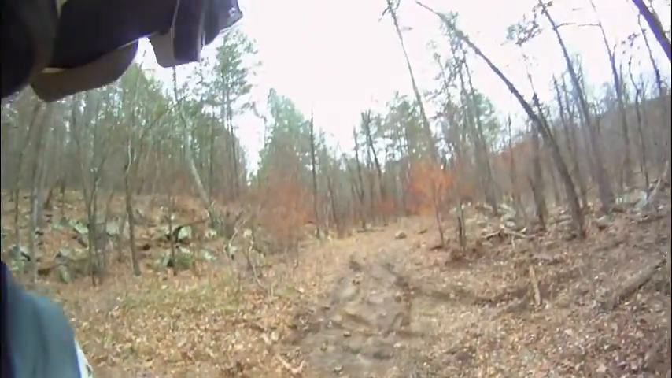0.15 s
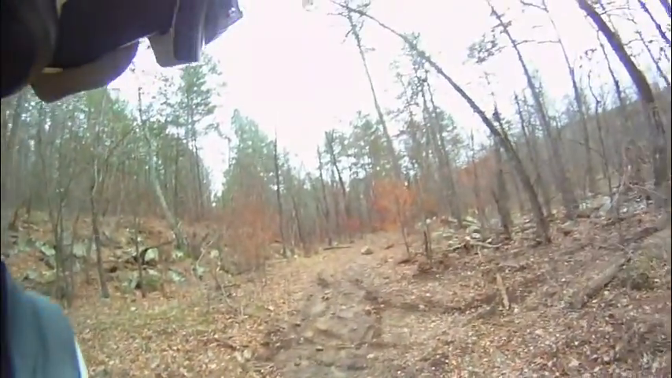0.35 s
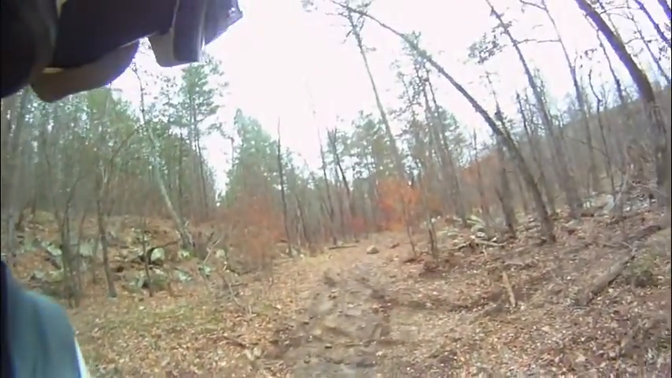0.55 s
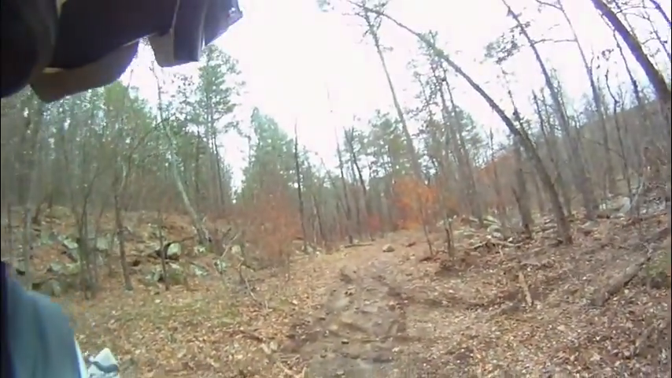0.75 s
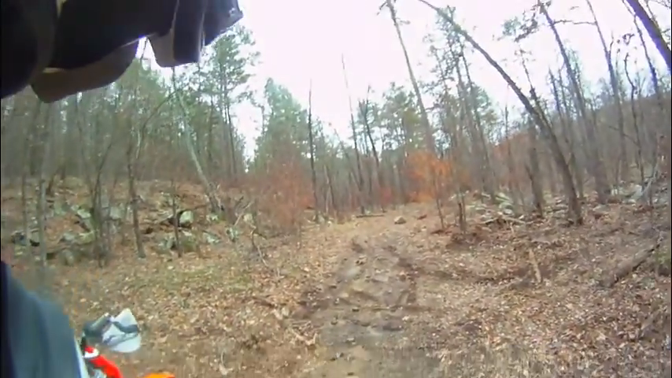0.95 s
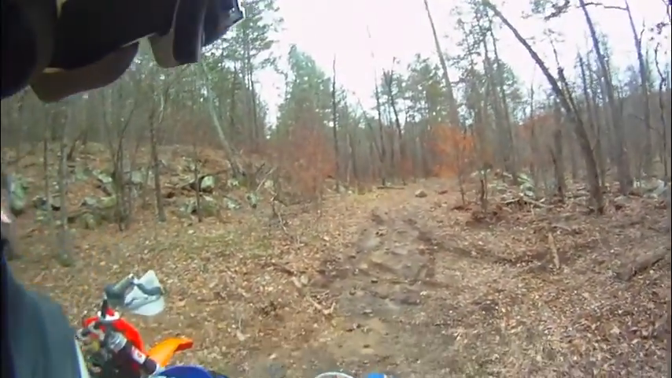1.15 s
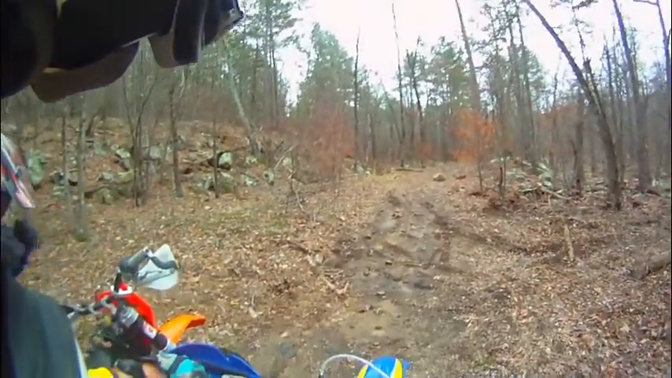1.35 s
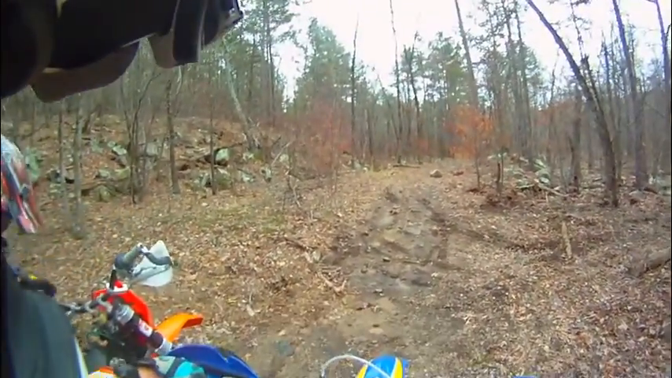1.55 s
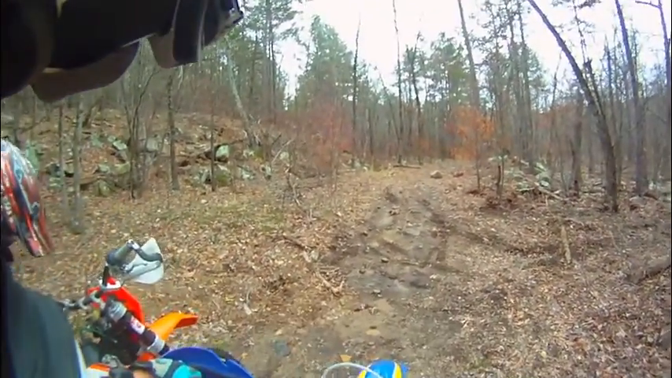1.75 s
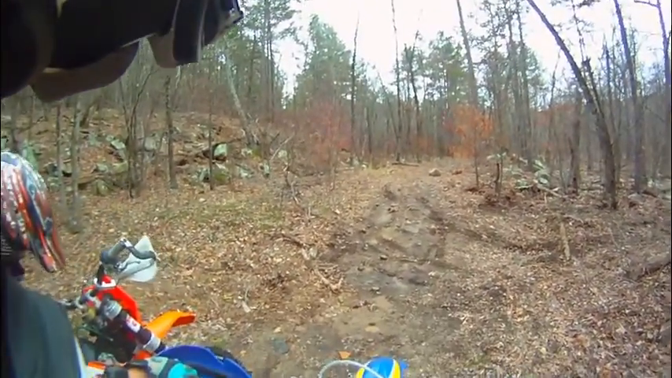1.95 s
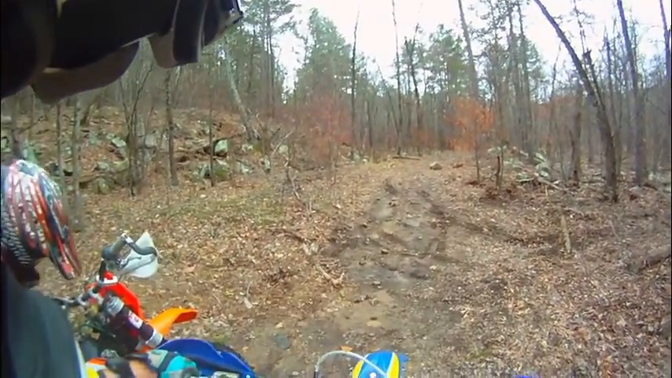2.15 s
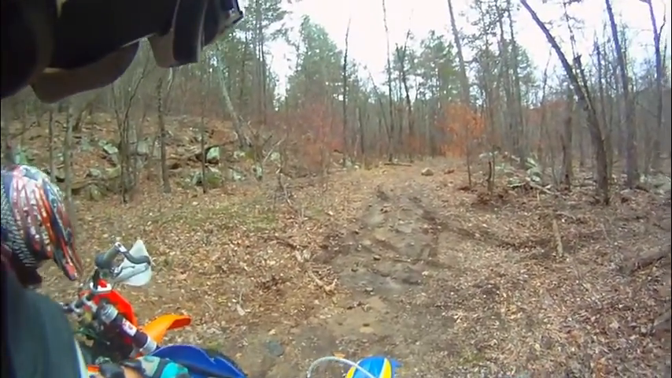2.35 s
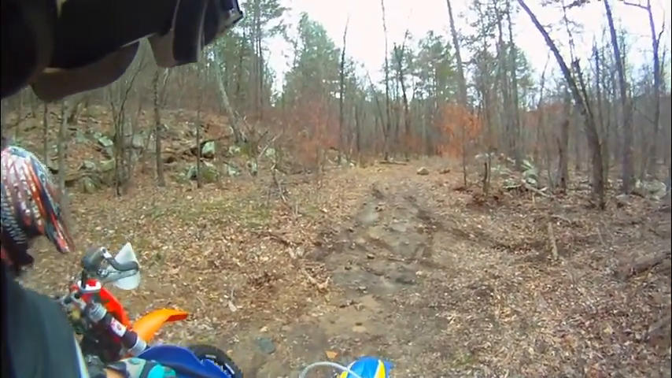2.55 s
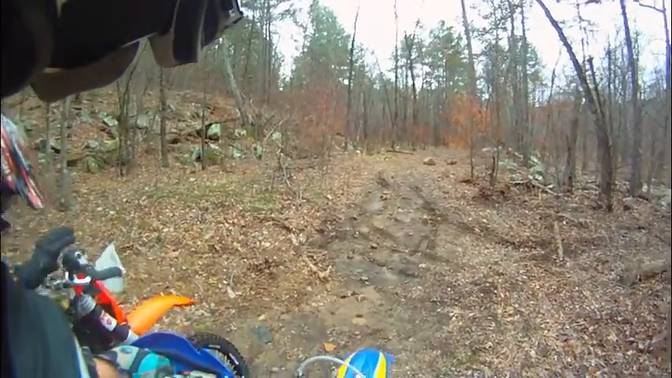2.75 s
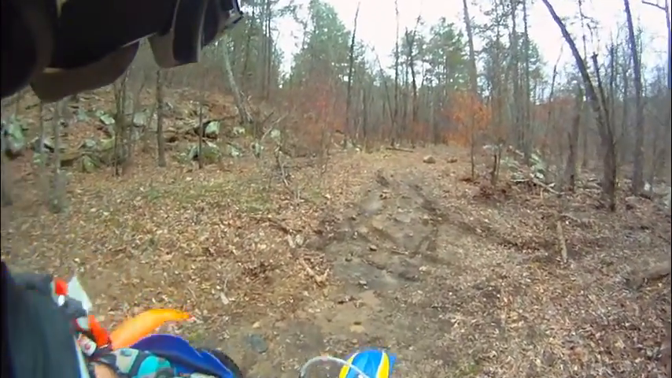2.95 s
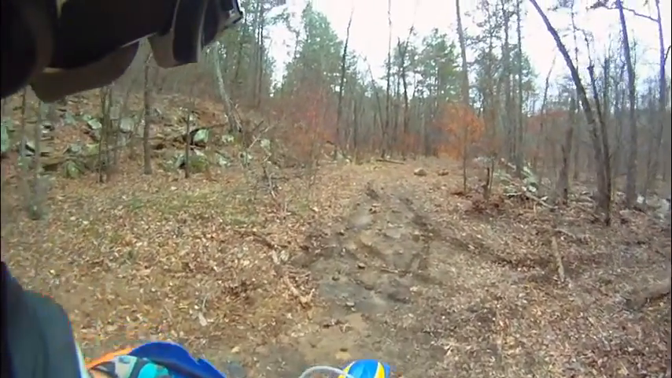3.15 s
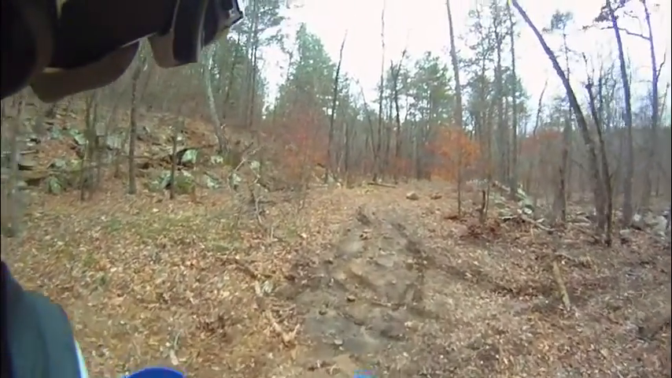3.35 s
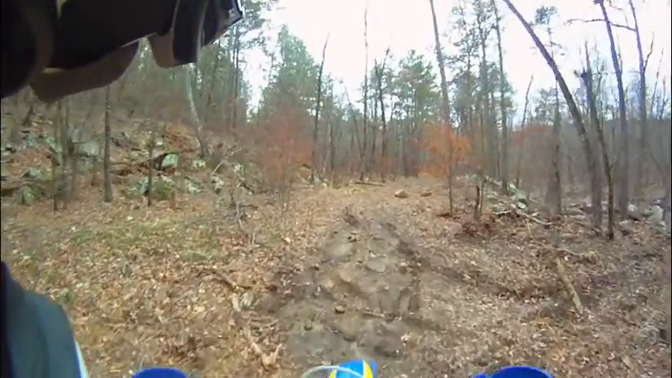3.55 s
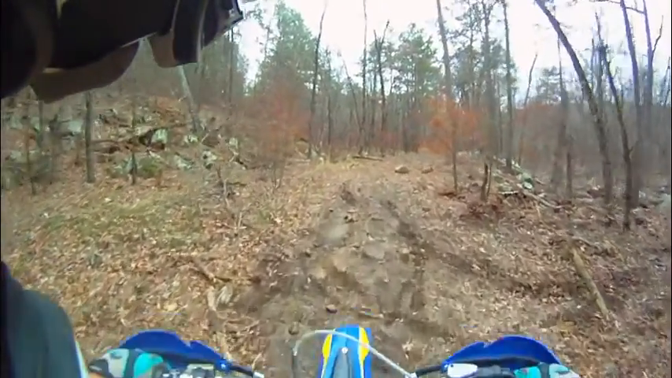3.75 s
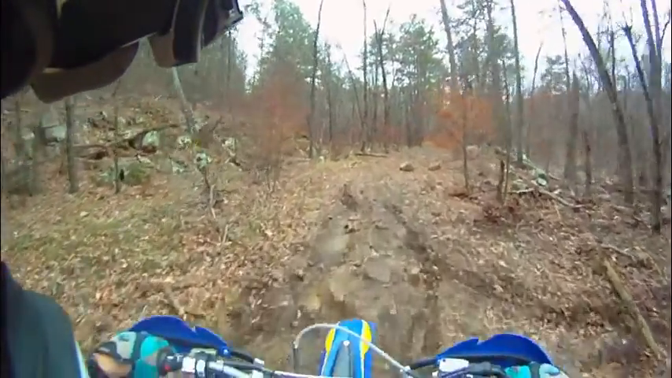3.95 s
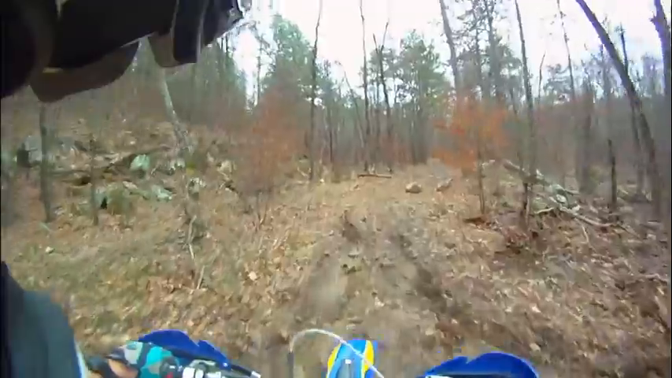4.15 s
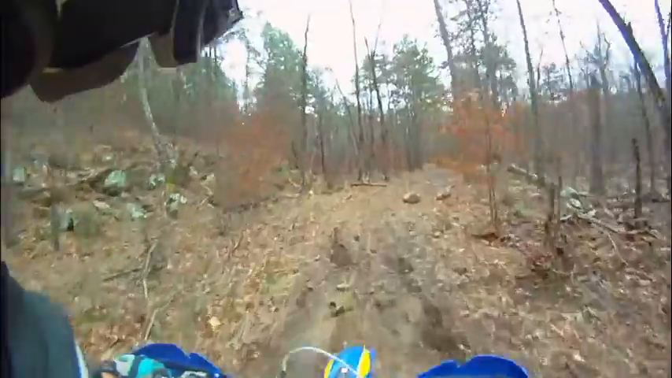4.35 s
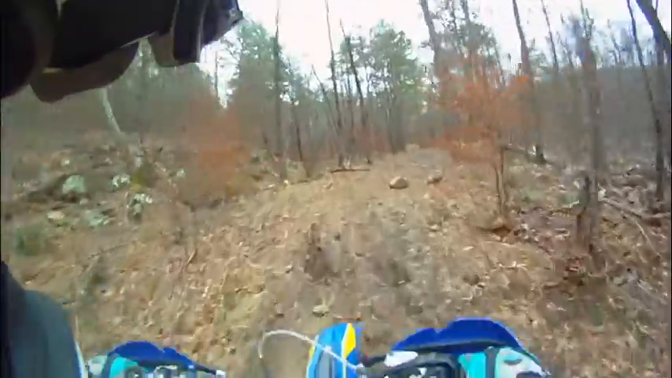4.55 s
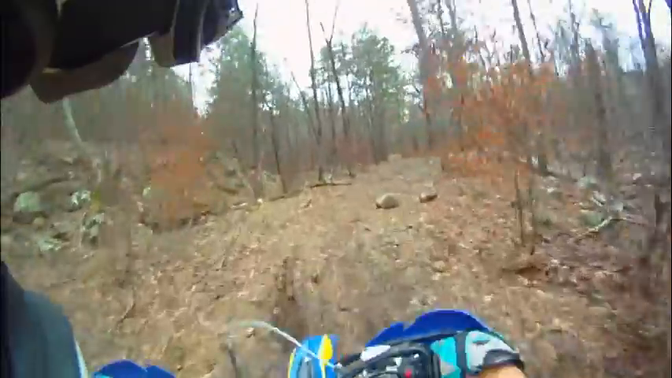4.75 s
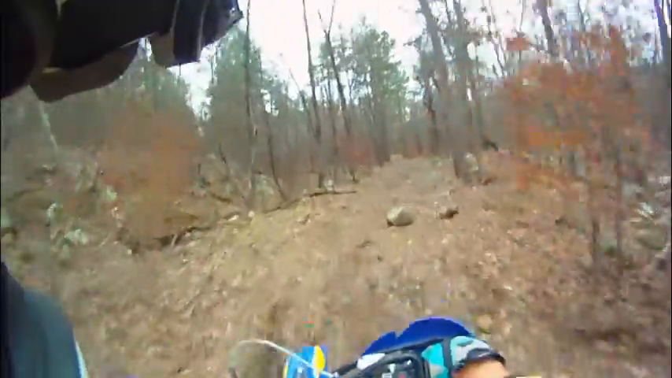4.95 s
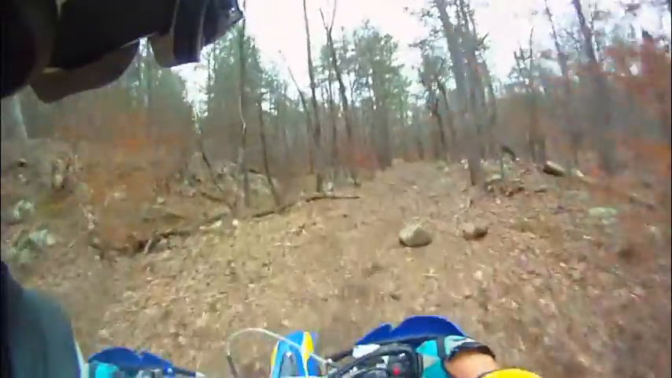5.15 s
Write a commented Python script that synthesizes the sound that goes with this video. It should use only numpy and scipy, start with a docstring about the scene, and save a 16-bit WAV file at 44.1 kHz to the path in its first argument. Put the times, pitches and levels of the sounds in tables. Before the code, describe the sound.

Heard from inside the rider's helmet on a dirt trail, a dirt bike starts up: a small click, a short straining crank with brief squeals, and the engine fires. It idles in low, booming puffs with a light mechanical clatter. Then the revs rise as the bike moves off, dip for a moment and climb again into a harder, rasping exhaust note. A faint hiss lies behind.

```python
"""On a dirt trail, inside the rider's helmet: a switch clicks, the electric starter cranks, and a
single-cylinder bike catches, idles, pulls away and takes more throttle.
Each firing is a rasp of air, a low thud, a booming puff and a crack that bounces through the exhaust.
Gears and valves rattle underneath, over faint hiss and a thin whistle."""
import sys
import numpy as np
from scipy import signal
from scipy.fft import rfft, irfft, next_fast_len
from scipy.io import wavfile
from scipy.ndimage import map_coordinates

SR = 44100
rng = np.random.default_rng(int(sys.argv[2]) if len(sys.argv) > 2 else 0)


def pcm_store(signal):
    """Save signal as 16-bit PCM."""
    levels = np.round(np.clip(np.atleast_2d(signal), -1, 1) * 32767)
    wavfile.write(sys.argv[1], SR, levels.astype(np.int16).T)


N = 229496
TIME = np.arange(N) / SR

# the engine catches, idles, pulls away and speeds up again: time_s, firing_hz
ENGINE_SPEED = [(.71, 6.56), (.864, 7.67), (.927, 13.23), (1.225, 14.78), (1.827, 15.69), (2.047, 14.63),
                (2.293, 15.82), (2.492, 14.21), (2.752, 24.73), (3.022, 27.65), (3.32, 24.35),
                (3.712, 24.45), (4.086, 20.34), (4.556, 25.36), (4.7, 28.75), (4.869, 27.99),
                (4.935, 31.98), (5.091, 30.15)]
# throttle, as the drive behind the exhaust's bark: time_s, drive_db
THROTTLE = [(0.802, -73), (1.05, -70), (2.482, -74), (2.585, -50), (2.84, -45.5), (3.04, -41.5),
            (3.2, -45.5), (3.7, -45), (4.1, -48.5), (4.59, -44), (4.66, -36), (4.92, -36.5), (5.17, -41.5)]
# handlebar switch and starter relay: start_s, level_db
CLICKS = [(0.082, -53.5), (0.269, -69)]
# the starter strains against the piston: start_s, length_s, extra_grind_db, squeal_db, mesh_hz
STRAINS = [(.31, .035, 3, -63, 700), (.401, .068, 4.5, -51.5, 730), (.504, .06, 5.5, -62, 750),
           (.62, .072, 3, -53, 700), (.726, .055, 6, -48, 750), (.889, .028, 8, -62, 750)]
# harmonics of the starter's gear mesh: multiple, gain_db
MESH_HARMONICS = [(2, -3), (5, 0), (6, -6), (8, -17), (12, -24)]
# the piston thumps over compression while cranking: start_s, level_db
CRANK_THUMPS = [(.41, -77), (.515, -70), (0.733, -73)]
# routes of the pressure front through the exhaust: delay_s (at 27 firings/s), gain_db, db_per_load_db
EXHAUST_PATHS = [(0, 0.5, -0.34), (.0065, -2.5, -1.08), (0.012, -9.5, -1.14), (0.013, -8.5, -0.6)]

# accents within each engine cycle: position_cycles, width_cycles, strength
PISTON_SLAPS = [(-.092, 0.059, 0.66), (.017, 0.032, 0.72), (.2, .03, 1)]
VALVE_TICKS = [(.05, 0.16, .35), (.3, 0.005, 0.27), (.64, .025, .6)]

# tone colour of each layer: frequency_hz, relative_db
HISS_EQ = [(40, -21), (100, -13), (300, -8), (650, -6), (1450, 0.5), (2300, -6), (3900, -3.5),
           (6000, -18.5), (10000, -17.5), (15000, -18.5)]  # background air
SWITCH_EQ = [(90, -43), (200, -18), (350, -2.5), (750, -3), (1200, -16), (1550, -1), (2200, -34),
             (5000, -43), (9000, -59)]  # dull clicks
GRIND_EQ = [(60, -38), (250, -20.5), (700, -15), (1050, -6.5), (1450, -4), (1900, -1), (2400, -13.5),
            (2900, -2), (3500, 0.5), (4100, -1.5), (4800, -8), (6000, -20), (6800, -27), (9000, -23),
            (15000, -50)]  # starter gears
CASE_EQ = [(80, -29.5), (250, -2.5), (420, 4.5), (560, -2), (780, -3.5), (980, -1.5), (1180, -3), (1420, 5),
           (1700, -3.5), (2050, -5), (2300, -16), (3400, -36), (6000, -43)]  # gears and chain in the engine cases
VALVE_EQ = [(1300, -38.5), (2350, -12), (2670, -11), (2870, -6.5), (3100, -5), (3500, -6.5), (4200, -2.5),
            (4500, -8.5), (4800, -5.5), (5200, -15.5), (5700, -17), (6700, -33.5), (9000, -55)]  # bright valve clatter
RASP_EQ = [(800, -36), (1400, 10), (2400, -1.5), (3200, 11), (3700, 1), (4200, 11), (5000, -38.5),
           (6500, -56), (9000, -77), (15000, -26)]  # gulp of air
FIZZ_EQ = [(4000, -10.5), (6700, -10), (7900, -5), (8800, -6), (9900, -6), (11000, -9), (13000, -13.5),
           (15000, -19)]  # the engine's top-end sizzle
FRONT_EQ = [(60, -39), (110, -30.5), (190, -11.5), (330, -15), (460, 0), (620, -8.5), (880, -9),
            (1150, -10), (1450, -25), (2000, -27), (2450, -30), (3400, -30), (4400, -82), (6500, -78)]  # crack of the pressure front
GAS_EQ = [(70, -66), (300, -5), (600, 2), (900, 6.5), (1150, 10), (1450, 7.5), (2000, 3.5), (2450, -13),
          (3200, -1.5), (4200, -1.5), (5200, -9), (6500, -34), (9000, -31), (15000, -68)]  # turbulent exhaust gas

# resonances: centre_hz, width_hz, gain_db
STARTER_RINGS = [(1050, 120, 4), (1480, 200, 7), (1900, 140, 4), (3200, 120, 3), (3560, 220, 4),
                 (4100, 120, 4), (6200, 220, 7)]  # starter housing
PANEL_RINGS = [(1032, 35, 9), (1423, 203, 4), (2016, 40, 3.5), (2630, 76, 9), (3156, 66, 7),
               (3540, 140, 4.5), (4152, 37, 7.5), (4600, 39, 2.5)]  # engine panels
FIZZ_RINGS = [(7870, 330, 5.5), (9920, 340, 2)]  # high rings in the sizzle
SILENCER_MODES = [(71, 17, -2), (137, 86, 2), (175.3, 18.7, -11.5), (360, 16, 6), (578, 150, -5.5),
                  (638, 28, 4.5), (706, 104, -3.5), (878, 34, -2.5)]  # standing waves and nulls of the silencer

# how each layer rides the engine: idle_db, db_per_speed_doubling, db_per_load_db
BOOM_LAW, GEAR_LAW = (-53, 9.5, -0.83), (-57, 9.3, 0.23)
VALVE_LAW, RASP_LAW = (-59.5, 8.75, -0.041), (-51.5, 13.26, -3)
IDLE_HZ, CRUISE_DB = 15.84, -42  # firing rate at idle; throttle drive above which the engine is under load


def amp(db):
    """Decibels to gain."""
    return 10 ** (np.asarray(db) / 20)


def unit(x):
    """Scaled to rms 1."""
    return x / np.sqrt(np.mean(x ** 2) + 1e-20)


def curve(rows, at=TIME):
    """An automation curve, read at the given moments."""
    return np.interp(at, *np.transpose(rows))


def noise():
    """White noise of rms 1."""
    return rng.standard_normal(N)


def wobble(knots_hz):
    """A smooth random modulator."""
    return map_coordinates(rng.standard_normal(int(N * knots_hz / SR) + 4), [TIME * knots_hz])


def eq_db(eq, hz):
    """An EQ curve, read on a log frequency axis."""
    points_hz, level_db = np.transpose(eq)
    return np.interp(np.log(hz + 1), np.log(points_hz), level_db)


def colour(x, eq, rings=(), size=4096):
    """Play x through a resonant body: a minimum-phase filter of energy 1."""
    hz = np.fft.rfftfreq(size, 1 / SR)
    rings_db = sum(db / (1 + (2 * (hz - centre) / width) ** 2) for centre, width, db in rings)
    cepstrum = irfft(np.log(amp(eq_db(eq, hz) + rings_db) + 1e-6))
    cepstrum[1:size // 2] *= 2
    cepstrum[size // 2 + 1:] = 0
    response = irfft(np.exp(rfft(cepstrum)))
    return signal.fftconvolve(x, response / np.linalg.norm(response))[:N]


def pulse(eq, size=1024):
    """A tight, symmetric transient of energy 1 with this tone colour."""
    gain = amp(eq_db(eq, np.fft.rfftfreq(size, 1 / SR)))
    shape = np.roll(irfft(gain), size // 2) * np.hanning(size)
    return shape / np.linalg.norm(shape)


def impulses(times, sizes):
    """One spike at each moment."""
    return np.bincount(np.clip(np.round(times * SR).astype(int), 0, N), sizes, N + 1)[:N]


def add(out, sound, start_s):
    """Drop a sound into the mix."""
    part = out[max(round(start_s * SR), 0):][:len(sound)]
    part += sound[:len(part)]


def bump(cycles, centre, width):
    """One swell per engine cycle, from half a cycle before the first firing."""
    return np.exp(-.5 * (((cycles - centre + .5) % 1 - .5) / width) ** 2) * (cycles > -.5)


def accents(cycles, rows):
    """A gain that jumps above 1 at set points of every cycle."""
    return 1 + sum(strength * bump(cycles, centre, width) for centre, width, strength in rows)


def engine_clock(first_firing_s=.799):
    """The running cycle count, and the moment and rate of each firing."""
    rate = curve(ENGINE_SPEED)
    cycles = np.cumsum(rate) / SR
    cycles -= np.interp(first_firing_s, TIME, cycles)
    times = np.interp(np.arange(int(cycles[-1]) + 1), cycles, TIME)
    return cycles, times, np.interp(times, TIME, rate)


def load_db(at):
    """How far the throttle is pushed past cruising."""
    return np.maximum(curve(THROTTLE, at) - CRUISE_DB, 0)


def follow(law, rates, at=TIME):
    """Level in dB of a layer that grows with engine speed and shifts under load."""
    idle_db, doubling_db, per_load = law
    return idle_db + doubling_db * np.log2(rates / IDLE_HZ) + per_load * load_db(at)


def pipe_trip(delay_s, rates):
    """Travel time in the pipe: faster running means hotter gas and a shorter trip."""
    return delay_s * (27 / rates) ** .28


def background(cycles, hiss_db=-76, whistle_hz=7870, whistle_db=-85, flutter_db=-76):
    """A bed of hiss and a thin whistle that flutters with the engine, more strongly once it pulls."""
    whistle = np.sin(2 * np.pi * np.cumsum(whistle_hz + 45 * wobble(230)) / SR)
    whistle *= amp(whistle_db + 1.6 * wobble(90))
    fuzzy = np.sin(2 * np.pi * np.cumsum(whistle_hz + 170 * wobble(900)) / SR)
    pulling = np.interp(TIME, [2.5, 2.9, 3.9, 4.5], [0.23, 0.82, 1, 0.79])
    hiss = amp(hiss_db) * colour(noise(), HISS_EQ)
    flutter = fuzzy * pulling * bump(cycles, centre=.47, width=.055) * amp(flutter_db + 1.2 * wobble(55))
    return hiss + whistle + flutter


def faint_tone(peak_s=3.54, length_s=.46, pitch_hz=620, waver_hz=6, level_db=-59):
    """A thin, slightly unsteady tone swells and fades during the ride."""
    swell = np.cos(np.pi * np.clip((TIME - peak_s) / length_s, -.5, .5))
    phase = 2 * np.pi * np.cumsum(pitch_hz + waver_hz * wobble(40)) / SR
    return amp(level_db) * np.sqrt(np.abs(swell)) * np.sin(phase)


def switches(t60_s=0.035):
    """Short dull clicks at the handlebar and the starter relay."""
    fades = sum(amp(db - 60 * np.abs(TIME - s) / t60_s) * (TIME >= s) for s, db in CLICKS)
    return colour(noise() * fades, SWITCH_EQ)


def starter(on_s=.26, off_s=1.15, spin_up_s=.06, run_down_s=.078, free_db=-56.5, sag=.13, edge_s=.012):
    """The starter spins up, grinds and runs down; each strain bites harder with a sagging squeal."""
    spin = np.clip((TIME - on_s) / spin_up_s, 0, 1) * np.exp(-np.maximum(TIME - off_s, 0) / run_down_s)
    grind_db, squeals = np.full(N, free_db), np.zeros(N)
    waver = .012 * wobble(900)
    for start_s, length_s, extra_db, squeal_db, mesh_hz in STRAINS:
        now = (TIME >= start_s) & (TIME < start_s + length_s)
        progress = (TIME[now] - start_s) / length_s
        bite = np.clip(np.minimum(progress, 1 - progress) * length_s / edge_s, 0, 1)
        phase = 2 * np.pi * np.cumsum(mesh_hz * (1 - sag * progress ** 2 + waver[now])) / SR
        grind_db[now] += extra_db * bite
        squeals[now] += amp(squeal_db) * bite * sum(amp(db) * np.sin(k * phase) for k, db in MESH_HARMONICS)
    grind = colour(rattle(600), GRIND_EQ, STARTER_RINGS)
    roughness = unit(amp(3 * wobble(250)))
    return spin * amp(grind_db) * grind + squeals * roughness


def rattle(grain_hz=700, grain_db=2):
    """Gritty machine texture: noise with a fast flicker in its level."""
    return unit(noise() * amp(grain_db * wobble(grain_hz)))


def machinery(cycles, fizz_db=-74, fizz_follow=0.45):
    """Gears and chain rattle the cases, valves tick and sizzle, and air rasps ahead of each firing."""
    rate = curve(ENGINE_SPEED)
    gear_db, valve_db, air_db = (follow(law, rate) for law in (GEAR_LAW, VALVE_LAW, RASP_LAW))
    fade_in = np.interp(TIME, [.72, .9], [0, 1])
    case = colour(rattle() * accents(cycles, PISTON_SLAPS) * amp(gear_db), CASE_EQ, PANEL_RINGS)
    valves = colour(rattle() * accents(cycles, VALVE_TICKS) * amp(valve_db), VALVE_EQ, PANEL_RINGS)
    gulp = 1.69 * bump(cycles, centre=-.185, width=.034) * amp(1.2 * wobble(20))
    rasp = colour(noise() * gulp * amp(air_db), RASP_EQ, PANEL_RINGS)
    fizz = rattle() * (0.98 + 1.7 * bump(cycles, centre=.43, width=.1))
    fizz *= amp(fizz_db + fizz_follow * (valve_db - valve_db.max()))
    return fade_in * (case + valves + rasp + colour(fizz, FIZZ_EQ, FIZZ_RINGS))


def thuds(times, rates, idle_db=-58, db_per_hz=-.3, idle_pitch_hz=81, t60_s=0.12, attack_s=0.0023):
    """The piston's low thud on cranking and firing: higher, shorter and softer as the revs climb."""
    t = TIME[:SR // 4]
    strokes = [(s, max(rate, IDLE_HZ), idle_db) for s, rate in zip(times, rates)]
    strokes += [(s, IDLE_HZ, db) for s, db in CRANK_THUMPS]
    out = np.zeros(N)
    for start_s, rate, db in strokes:
        sped_up = t * (rate / IDLE_HZ) ** .98
        envelope = amp(-60 * sped_up / t60_s) * (1 - np.exp(-sped_up / attack_s))
        thud = np.sin(2 * np.pi * idle_pitch_hz * sped_up) * envelope
        add(out, amp(db + db_per_hz * (rate - IDLE_HZ)) * thud, start_s)
    return out


def boom(times, rates, from_hz=228, to_hz=338, glide_s=.014, attack_s=.0015, lead_s=.0029):
    """Each puff rings a cavity whose pitch rises as the piston closes it off."""
    t = TIME[:SR // 8]
    turns = to_hz * t - (to_hz - from_hz) * glide_s * (1 - np.exp(-t / glide_s))  # the glide at idle
    levels_db = follow(BOOM_LAW, np.minimum(rates, 21.8), times)  # stops growing at 21.8 firings/s
    out = np.zeros(N)
    for start_s, rate, db in zip(times, rates, levels_db):
        age_cycles = t * rate
        body = np.exp(-(age_cycles / .17) ** 2 / 2)
        tail = amp(-19 - 12 * age_cycles)
        transpose = rng.normal(1, .018) * (rate / IDLE_HZ) ** .1
        puff = -np.sin(2 * np.pi * turns * transpose) * (body + tail) * (1 - np.exp(-t / attack_s))
        add(out, puff / np.linalg.norm(puff) * np.sqrt(SR / rate) * amp(db), start_s - lead_s)
    return out


def bark(times, rates, jitter_s=.00004, scatter_db=1, gush_s=.0016, gas_db=-5.5, shell_db=-8, front_db=-3):
    """The pressure front leaves by several paths; each knocks the silencer's shell and trails gas."""
    drive_db = curve(THROTTLE, times)
    fronts = np.zeros(N)
    for delay_s, db, per_load in EXHAUST_PATHS:
        arrivals = times + pipe_trip(delay_s, rates) + rng.normal(0, jitter_s, len(times))
        level_db = drive_db + db + per_load * load_db(times) + rng.normal(0, scatter_db, len(times))
        fronts += impulses(arrivals, amp(level_db) * np.sqrt(SR / rates))
    gush = np.exp(-TIME[:SR // 20] / gush_s)
    gas_power = signal.fftconvolve(fronts ** 2, gush / gush.sum())[:N]
    turbulence = np.sqrt(np.abs(gas_power)) * noise()
    gas_and_shell = colour(amp(gas_db) * turbulence - amp(shell_db) * fronts, GAS_EQ, PANEL_RINGS)
    crack = signal.fftconvolve(fronts, pulse(FRONT_EQ), "same")
    return gas_and_shell + amp(front_db) * crack


def blast(times, rates, centre_hz=680, sweep_hz=360, glide_s=.0022, width_s=.0015, full_db=-36):
    """The pipe draws the main blast into a quick upward chirp; more throttle leans on its high end."""
    t = np.arange(-SR // 100, SR // 100) / SR
    turns = centre_hz * t + sweep_hz * glide_s * np.log(np.cosh(t / glide_s))
    variations = rng.standard_normal((len(times), 3)) * [.025, .5, .00005]
    out = np.zeros(N)
    for start_s, rate, (detune, scatter_db, jitter_s) in zip(times, rates, variations):
        drive_db = curve(THROTTLE, start_s)
        slack_db = np.clip(drive_db - full_db, -14, 0)
        peak_s = .00061 + .00017 * slack_db  # less throttle peaks earlier, lower in the chirp
        swell = np.exp(-((t - peak_s) / width_s) ** 2 / 2)
        phase = 2 * np.pi * turns * (1 + detune)
        wave = swell * (np.cos(phase) - .22 * np.sin(2 * phase))  # a steepened wave gains its octave
        gain = amp(drive_db + .45 * slack_db + 1 + scatter_db) * np.sqrt(SR / rate)
        arrival_s = start_s + pipe_trip(.0065, rate) + jitter_s
        add(out, gain * wave / np.linalg.norm(wave), arrival_s + t[0])
    return out


def scene():
    """The whole bike at the helmet; the silencer's standing waves colour all that leaves the exhaust."""
    cycles, times, rates = engine_clock()
    puffs = boom(times, rates) + thuds(times, rates) + bark(times, rates) + blast(times, rates)
    exhaust = colour(puffs, eq=[(20, 0), (20000, 0)], rings=SILENCER_MODES)
    return (exhaust + machinery(cycles) + starter() + switches() + background(cycles) + faint_tone())[None]


def record(dry, low_cut_hz=68.5, top_hz=15300):
    """Master EQ: thin the deep bass and cut the very top with a brick wall."""
    thin = signal.sosfilt(signal.butter(2, low_cut_hz, "high", fs=SR, output="sos"), dry)
    size = next_fast_len(N + SR // 2)
    passband = np.fft.rfftfreq(size, 1 / SR) < top_hz
    return irfft(rfft(thin, size) * passband, size)[..., :N]


dry = scene()
out = record(dry)
pcm_store(out)
```